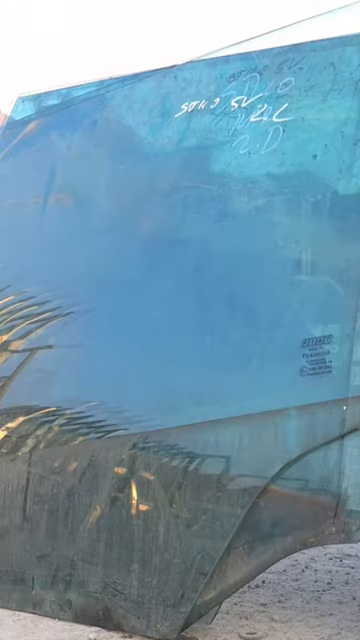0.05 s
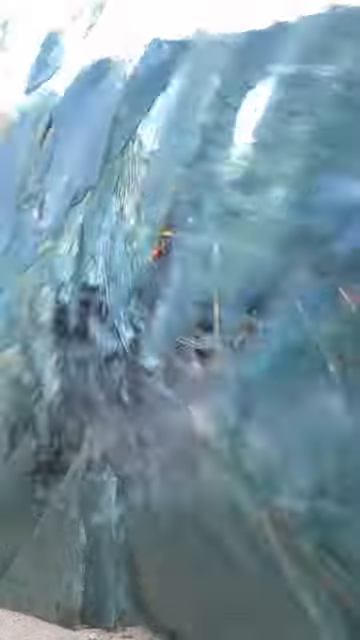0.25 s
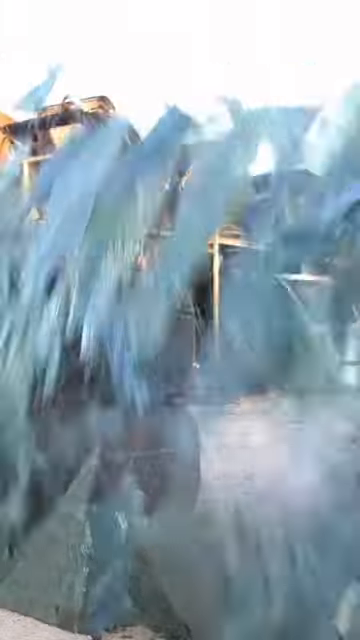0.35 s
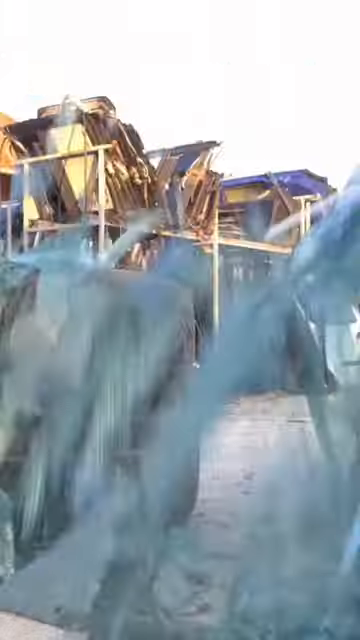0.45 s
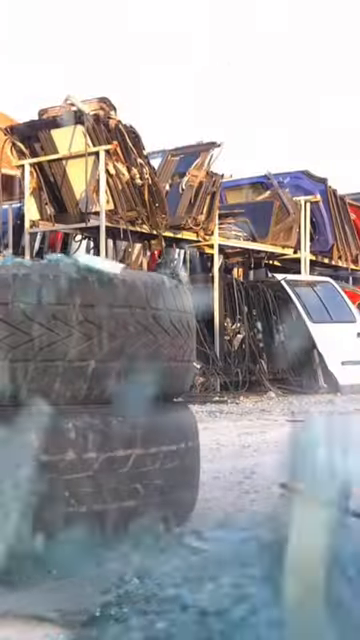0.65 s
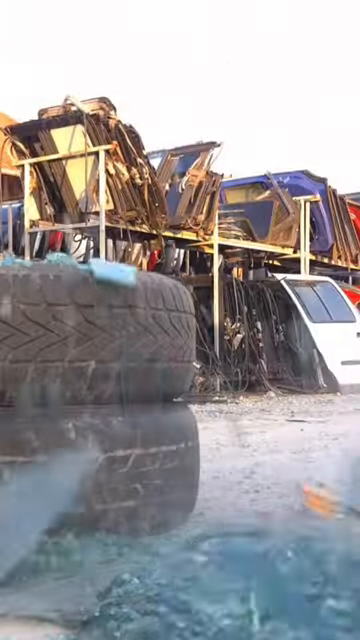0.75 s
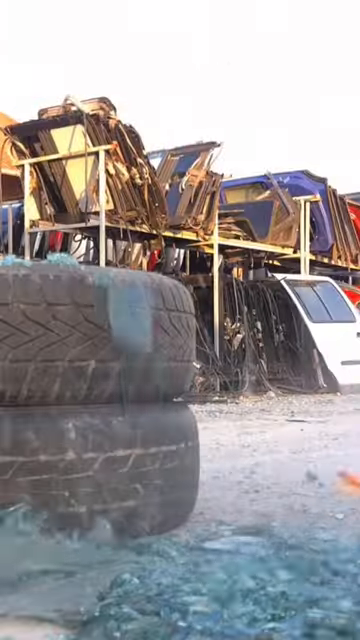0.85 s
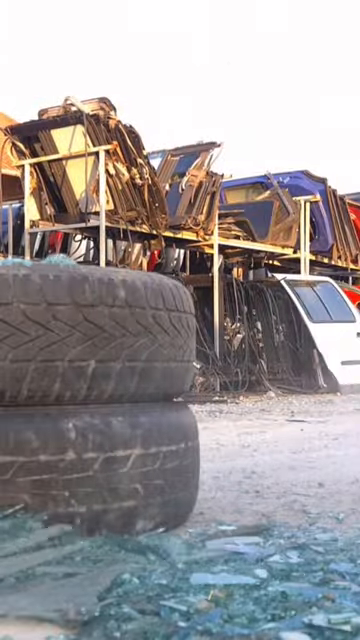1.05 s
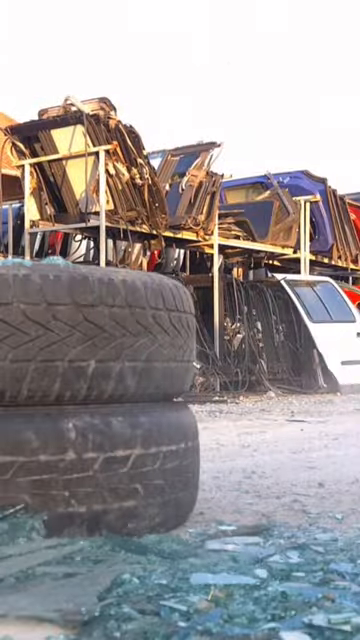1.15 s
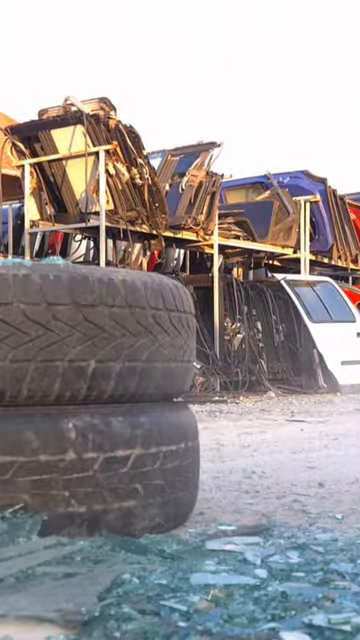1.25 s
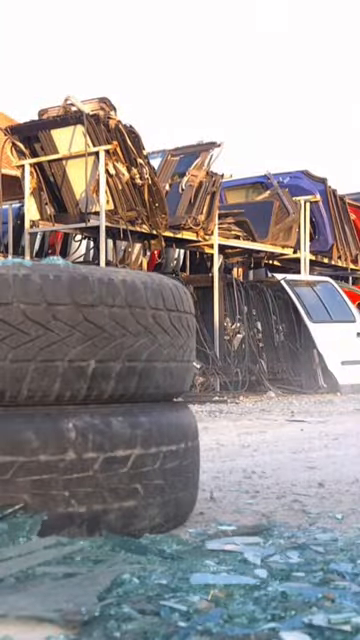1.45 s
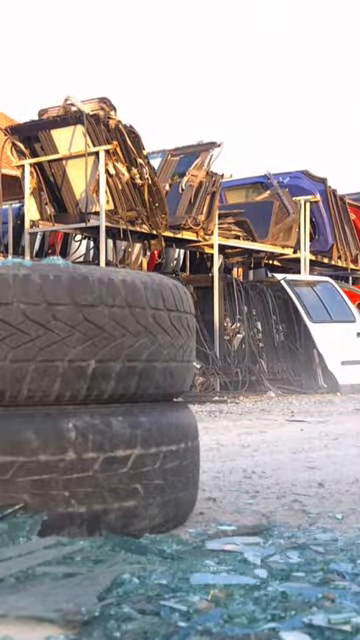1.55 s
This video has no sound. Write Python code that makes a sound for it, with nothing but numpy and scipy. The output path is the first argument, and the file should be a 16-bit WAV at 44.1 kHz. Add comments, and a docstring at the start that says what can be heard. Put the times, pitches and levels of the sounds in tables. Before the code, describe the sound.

A glass car window shatters close by outdoors. A sharp knock at 0.2 seconds is followed by the pane cracking and bursting around 0.3. Stacked tyres and their rims boom and thump under falling pieces, while a bright shower of glass crumbs peaks near 0.6 and thins after 1 second. A few lone shards click down until about 1.5, over a faint hum and rumble.

```python
"""A toughened car window is smashed against a stack of tyres in an open scrapyard.
First comes a sharp knock, then cracks race through the pane and it bursts. The tyres and their rims
boom under the blows while thousands of glass crumbs and larger pieces pour over them onto the ground.
Last, a few lone shards click down. A faint hum and rumble lie beneath it all."""
import sys
import numpy as np
from scipy import signal
from scipy.fft import rfft, irfft
from scipy.io import wavfile

SR = 44100
rng = np.random.default_rng(int(sys.argv[2]) if len(sys.argv) > 2 else 0)


def put_to_file(sound):
    """Save the sound as 16-bit audio at rate SR, in the file named by the first command-line argument."""
    columns = np.atleast_2d(sound).T  # one column per channel
    safe = np.clip(columns, -1, 1)
    whole_steps = np.round(safe * 32767)
    wavfile.write(sys.argv[1], SR, whole_steps.astype(np.int16))


N = 70560
TIME = np.arange(N) / SR

# the dull tone of a piece of glass landing: (frequency [Hz], level [dB])
CLACK_TONE = [(200, -10.5), (550, -0.5), (900, 1), (1500, -0.5), (2200, -5), (3200, -4), (5000, -17),
              (12000, -5)]


def bursting_pane():
    """Cracks race through the pane in surges and make it ring as it comes apart."""
    # a fade is the time to fall by 60 dB
    # surges of cracking: (time [s], level [dB], rise [s], hold [s], fade [s], ringing [dB])
    surges = [(0.2855, -5.5, 0.027, 0.00054, 0.005, -7), (0.2904, -3.5, 0.00061, 0.0028, 0.012, -5.5),
              (0.301, -15, 0.013, 0.0057, 0.064, -26), (0.328, -14, 0.022, 0.0012, 0.042, -14.5)]
    # the notes of the pane: (pitch [Hz], level [dB], fade [s])
    pane_notes = [(412.7, -22, 0.011), (1533, 3.5, 0.041), (2870, 1, 0.0062), (3560, 5, 0.0098),
                  (5420, 0.5, 0.0079), (6650, -0.5, 0.0016)]
    # the tone of the cracks: (frequency [Hz], level [dB])
    crack_tone = [(100, -26.5), (420, 10), (700, -1), (1100, -0.5), (2000, -8.5), (2700, 6), (4500, 4),
                  (9000, 3), (15000, 1)]
    cracks = clicks(per_s=7000, spread_db=0.5)
    ringing = unit_power(sum(from_db(db) * unit_power(ring(cracks, hz, fade))
                             for hz, db, fade in pane_notes))
    crack_gain, ring_gain = 0, 0
    for start, db, rise, hold, fade, ring_db in surges:
        growth = np.log(100) * np.minimum(TIME - start, 0) / rise
        decay = np.log(1000) * np.maximum(TIME - start - hold, 0) / fade
        surge = from_db(db) * np.exp(np.maximum(growth - decay, -20))
        crack_gain += surge
        ring_gain += from_db(ring_db) * surge
    return colour(cracks * crack_gain, crack_tone) + ringing * ring_gain


def knock(start=0.2002):
    """A hard blow from the left: a push of air, a brief ring, a tick, a near echo and a scattered tail."""
    # the notes the blow sets ringing: (pitch [Hz], level [dB], fade [s])
    notes = [(450, -33, 0.17), (734, -19, 0.06), (876, -28, 0.035), (1254, -16.5, 0.035),
             (2040, -5.5, 0.027), (2630, -16.5, 0.015), (2860, -35, 0.032)]
    # the tone of the first hard contact: (frequency [Hz], level [dB])
    tick_tone = [(400, -29), (1300, 3), (2400, 1.5), (3500, -5.5), (5500, -14), (8000, 8), (9300, 2.5),
                 (11000, -8.5), (15000, -47)]
    # the tone of the scattered sound: (frequency [Hz], level [dB])
    tail_tone = [(70, -37), (150, -32), (280, 11.5), (750, 8), (1050, 1), (2200, -2.5), (4700, -5),
                 (8800, -7.5), (15000, -14.5)]
    tap = (np.arange(N) == int(start * SR)) * 1.0
    ringing = sum(from_db(db) * ring(tap, hz, fade) for hz, db, fade in notes)
    swing = (TIME - start) / 0.00041
    push = without_bass(swing * np.exp((1 - swing ** 2) / 2), hz=390)   # pressure dips, then rises
    tick = colour(rng.standard_normal(N) * dying(start, fade=0.0065), tick_tone)[0]
    hit = from_db(-6.5) * push + ringing + from_db(-7.5) * tick
    hit += from_db(-20) * np.interp(TIME - 0.016, TIME, hit)   # the echo
    right = np.interp(TIME - 0.00023, TIME, hit)   # reaches the right ear a little later
    tail = colour(rng.standard_normal((2, N)) * dying(start, fade=0.21), tail_tone)
    return np.array([hit, right]) + from_db(-22.5) * tail


def crumbs():
    """Falling glass crumbs tick and ring briefly, thinning out as the flow dies down."""
    # the flow of crumbs: (time [s], level [dB])
    flow_levels = [(.27, -90), (.31, -23), (.352, -26.5), (.39, -21), (.48, -18), (.565, -16), (.66, -16),
                   (.745, -18), (.79, -19.5), (.88, -19), (.96, -26), (1.035, -21), (1.09, -30.5),
                   (1.2, -33), (1.3, -39), (1.39, -45.5), (1.44, -44), (1.51, -50), (1.6, -56.5)]
    # their bright tone: (frequency [Hz], level [dB])
    crumb_tone = [(1000, -37.5), (2500, 3), (3400, -5.5), (4300, -2), (5800, 6), (9000, 6.5), (12500, 8.5),
                  (15500, 11.5)]
    flow = level(flow_levels)
    ticks = clicks(per_s=7000 * (flow / flow.max()) ** 0.6, spread_db=2.5)
    rings = tinkle(ticks, pitches=np.linspace(3000, 15500, 90), cycles=170)
    return colour(unit_power(unit_power(ticks) + from_db(1) * rings) * flow, crumb_tone)


def larger_pieces():
    """Larger pieces clatter, and flat ones clink, lower in pitch than the crumbs."""
    # the fall of larger pieces: (time [s], level [dB])
    clatter_levels = [(.27, -96), (.31, -23.5), (.39, -37.5), (.52, -32), (.61, -28), (.7, -28),
                      (.79, -28.5), (.9, -31.5), (1.04, -37), (1.14, -42.5), (1.3, -50.5), (1.47, -55),
                      (1.6, -75)]
    flow = level(clatter_levels)
    clinks = tinkle(clicks(per_s=330, spread_db=2), pitches=np.geomspace(1250, 4195, 40), cycles=53)
    clatter = colour(clicks(per_s=1200, spread_db=0.5) * flow, CLACK_TONE)
    return clatter + from_db(-3) * clinks * flow


def tyre_stack():
    """The tyres and their rims boom under the blows and drum under the falling glass."""
    # blows on the stack: (time [s], level [dB], contact time [s], share that rings the rims [0-1])
    blows = [(0.3383, -7, 0.00055, 0.88), (0.3465, -6, 0.0031, 0), (0.3634, -21.5, 0.001, 0.64),
             (0.43, -26, 0.0055, 0), (0.5598, -19, 0.0012, 0.84), (0.76, -27, 0.0022, 0.4),
             (1.416, -55, 0.00098, 0.86)]
    # the notes of the tyres: (pitch [Hz], level [dB], fade [s])
    tyre_notes = [(101, -14, 0.28), (125, -3, 0.18), (204.2, -6.5, 0.22), (276.7, -16, 0.25)]
    # the notes of the rims: (pitch [Hz], level [dB], fade [s])
    rim_notes = [(358, 0.5, 0.67), (386, -7, 0.2), (424, -32, 0.36), (555.8, -17.5, 0.57), (629, -35, .08),
                 (761, -21, 0.05), (945, -35.5, 0.1)]
    # glass pattering on the stack: (time [s], level [dB])
    patter_levels = [(.28, -50), (.31, -21), (.36, -17.5), (.52, -26.5), (.7, -25), (.8, -27), (.92, -34),
                     (.97, -41), (1.17, -44), (1.3, -59), (1.6, -81)]
    # the deep tone of that patter: (frequency [Hz], level [dB])
    patter_tone = [(30, -24.5), (65, -8.5), (115, 6.5), (150, 1), (180, -10.5), (220, -4), (300, -7.5),
                   (400, -15), (700, -26), (1500, -64.5)]
    on_tyres, on_rims = np.zeros((2, N))
    for time, db, contact, share in blows:
        force = np.exp(-(2 * (TIME - time) / contact) ** 2)
        force = from_db(db) * force / force.sum()
        on_tyres += force
        on_rims += share * force
    boom = sum(from_db(db) * ring(on_tyres, hz, fade) for hz, db, fade in tyre_notes)
    boom += sum(from_db(db) * ring(on_rims, hz, fade) for hz, db, fade in rim_notes)
    taps = clicks(per_s=630, spread_db=1.5)
    patter = level(patter_levels) * (taps + from_db(-10) * rng.standard_normal((2, N)))
    rim_fade = 0.06   # under the loose glass the rims ring only briefly
    singing = sum(from_db(db / 2) * ring(patter, hz, rim_fade) for hz, db, _ in rim_notes)
    singing *= from_db(-8.5) * np.sqrt(4 * np.log(1000) / (rim_fade * SR))
    return without_bass(colour(patter, patter_tone) + singing - boom, hz=138)


def slabs():
    """Heavy slabs land on the rubber with dead thumps, each a few swings of air pressure; the sharp, loudest
    one at 0.34 s is the pane itself slapping the tyres."""
    # the landings: (time [s], level [dB], pitch [Hz], half length [s])
    landings = [(.3078, -14.5, 154, 0.0019), (0.3398, -1, 466, 0.0012), (0.3474, -8, 136, 0.012),
                (.3645, -12.5, 450, 0.0014), (0.4364, -13, 112, 0.011), (0.636, -19.5, 130, 0.016),
                (0.765, -9, 156, 0.0049), (.876, -23.5, 125, 0.0063), (.935, -26, 166, 0.0047)]
    out = np.zeros(N)
    for time, db, hz, half_length in landings:
        swell = np.exp(-np.minimum(((TIME - time) / half_length) ** 2, 50))
        out += from_db(db) * np.cos(2 * np.pi * hz * (TIME - time)) * swell
    return out


def lone_shards():
    """Each shard hits the ground with a gritty click, two close notes and a dull clack."""
    # the landings: (time [s], level [dB], pitch [Hz], fade [s], left over right [dB], clack [dB])
    landings = [(0.8965, -19.5, 1770, .006, -16, 1), (1.0386, -23, 13200, 0.055, 3, -12),
                (1.105, -23.5, 13200, .13, -7, -25), (1.13, -20.5, 2630, 0.0071, 6, -4),
                (1.148, -28, 13140, .05, -3, -20), (1.1695, -21, 11500, 0.0033, 1, 5.5),
                (1.1792, -18.5, 11000, .004, 0, 0), (1.203, -27, 12900, 0.0055, 10, -4),
                (1.232, -23.5, 13100, 0.029, -12, -22), (1.3703, -17.5, 14000, .012, 0, -14),
                (1.4075, -18.5, 8400, 0.0024, -5, -22), (1.4096, -15, 5750, 0.0051, -7, -27),
                (1.4215, -46, 7520, .006, 1, -20), (1.4673, -33.5, 4650, 0.0072, -10, -18),
                (1.4793, -32.5, 5800, .008, -9, -20), (1.559, -44.5, 11460, .01, -8, -23),
                (1.572, -38.5, 12500, .01, -2, -22)]
    # the tone of the gritty click: (frequency [Hz], level [dB])
    grit_tone = [(300, -25), (1000, -9), (1800, 0), (3500, 20), (6000, 18), (15000, 10)]
    grit = colour(rng.standard_normal((2, N)), grit_tone)
    dull_noise = colour(rng.standard_normal((2, N)), CLACK_TONE)
    out = np.zeros((2, N))
    for start, db, hz, fade, pan_db, clack_db in landings:
        rise = 10 ** (np.clip(TIME - start, -1, 0) / 0.00027)
        contact = np.where(TIME < start, rise, dying(start, fade=0.0068))
        click = without_bass(grit * contact, 0.43 * hz)
        phase = 2 * np.pi * hz * (TIME - start)
        notes = (np.sin(phase) + from_db(-13) * np.sin(0.95 * phase)) * dying(start, fade)
        clack = from_db(clack_db) * dull_noise * dying(start, fade=0.019)
        side_gains = 0.5 * from_db(db + np.array([[pan_db], [-pan_db]]) / 2)
        out += side_gains * (click + from_db(-0.5) * notes + clack)
    return out


def yard_echoes(sound):
    """The ground and the heaps of scrap scatter the sound back in a short blur."""
    echoes = rng.standard_normal((2, N)) * dying(start=0.0012, fade=0.049)
    return from_db(-7.5) * through(sound, echoes / np.linalg.norm(echoes[0]))


def background():
    """Outdoor air, a deep rumble that swells with the crash, and a far hum."""
    # the tone of the outdoor air: (frequency [Hz], level [dB])
    air_tone = [(25, -21), (100, 0), (170, -1), (300, 6), (390, -18), (600, -12.5), (1200, -11),
                (8000, -37.5)]
    # the swell of the rumble: (time [s], level [dB])
    rumble_levels = [(0, -54), (.1, -63.5), (.25, -50), (.28, -46), (.35, -38), (.42, -42), (.7, -53.5),
                     (.95, -59), (1.15, -64.5), (1.6, -66.5)]
    # the tone of the rumble: (frequency [Hz], level [dB])
    rumble_tone = [(20, -14.5), (45, -9), (65, -0.5), (100, -26.5), (200, -46), (600, -50.5)]
    # the loudness of the hum: (time [s], level [dB])
    hum_levels = [(0, -60), (.2, -66), (1.3, -69.5), (1.45, -69), (1.54, -72), (1.6, -88)]
    # noise that is mostly the same in both ears
    air, deep = rng.standard_normal((2, 1, N)) + 0.3 * rng.standard_normal((2, 2, N))
    rumble = level(rumble_levels) * colour(deep, rumble_tone)
    hum = level(hum_levels) * unit_power(ring(rng.standard_normal(N), hz=389, fade=0.69))
    return from_db(-74.5) * colour(air, air_tone) + rumble + hum


def clicks(per_s, spread_db):
    """Random stereo clicks of average power 1, each with its own size and direction."""
    chance = np.clip(per_s / SR, 1e-5, 1)
    size = unit_power(from_db(spread_db * np.minimum(rng.exponential(1, N), 3)))
    size *= rng.choice([-1, 1], N)
    left = size * (rng.random(N) < chance) / np.sqrt(chance)
    lag = np.round(rng.uniform(-1, 1, N) * 0.0003 * SR)   # up to 0.3 ms between the ears
    right_arrival = np.clip(np.arange(N) + lag, 0, N - 1).astype(int)
    return np.array([left, np.bincount(right_arrival, left, N)])


def tinkle(hits, pitches, cycles):
    """Share the hits among bits of glass with these pitches [Hz], each ringing about so many cycles."""
    owner = rng.integers(0, len(pitches), N)
    lengths = cycles * np.exp(0.5 * rng.standard_normal(len(pitches)))
    pitches = pitches * rng.uniform(0.98, 1.02, len(pitches))
    return unit_power(sum(ring(hits * (owner == k), hz, lengths[k] / hz) * np.sqrt(hz / lengths[k])
                          for k, hz in enumerate(pitches)))


def ring(hits, hz, fade):
    """One ringing note: each click starts a fading sine wave as tall as itself."""
    decay, step = np.exp(-np.log(1000) / (fade * SR)), 2 * np.pi * hz / SR
    return signal.lfilter([0, np.sin(step)], [1, -2 * decay * np.cos(step), decay ** 2], hits + 1e-18)


def colour(sound, tone, size=8192):
    """Give a sound the tone in (frequency [Hz], level [dB]) rows; white noise keeps its power."""
    hz, db = np.transpose(tone)
    grid = np.maximum(np.arange(size // 2 + 1) * SR / size, 1)
    cepstrum = irfft(np.log(from_db(np.interp(np.log(grid), np.log(hz), db))))
    # fold it so that the filter never sounds before the hit
    cepstrum[1:size // 2] *= 2
    cepstrum[size // 2 + 1:] = 0
    response = irfft(np.exp(rfft(cepstrum)))
    return through(sound, response / np.linalg.norm(response))


def through(sound, response):
    """Let every sample of the sound set off a copy of the response."""
    return signal.fftconvolve(np.atleast_2d(sound), np.atleast_2d(response), axes=1)[:, :N]


def without_bass(sound, hz):
    """Turn down what lies below hz."""
    return signal.sosfilt(signal.butter(2, hz, "high", fs=SR, output="sos"), sound)


def dying(start, fade):
    """A gain that jumps to 1 at start [s], then falls 60 dB in fade [s]."""
    return (TIME >= start) * np.exp(-np.log(1000) * np.minimum(np.abs(TIME - start) / fade, 10))


def level(rows):
    """Gain over time from (time [s], level [dB]) rows; silent before the first."""
    return from_db(np.interp(TIME, *np.transpose(rows), left=-np.inf))


def from_db(db):
    """Turn decibels into a gain."""
    return 10 ** (np.asarray(db) / 20)


def unit_power(sound):
    """Scale to an average power of 1."""
    return sound / np.sqrt(np.mean(sound ** 2) + 1e-20)


def scene():
    """All the sources together in the open yard."""
    glass = knock() + bursting_pane() + crumbs() + larger_pieces()
    shards = lone_shards()
    echoes = yard_echoes(glass + from_db(-9) * shards)   # lone shards land close by and scatter less
    return glass + shards + echoes + tyre_stack() + slabs() + background()


def record(dry):
    """The highest peaks overload and are rounded off; the very top of the treble is cut."""
    ceiling, cutoff_hz = 0.85, 15700
    rounded = dry / (1 + (dry / ceiling) ** 4) ** 0.25
    return signal.sosfiltfilt(signal.ellip(10, 0.1, 60, cutoff_hz, fs=SR, output="sos"), rounded)


dry = scene()
out = record(dry)
put_to_file(out)
```